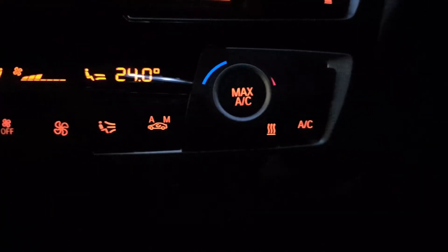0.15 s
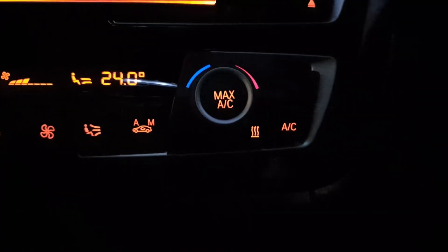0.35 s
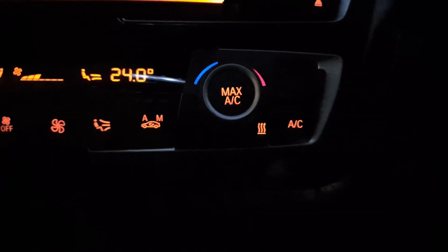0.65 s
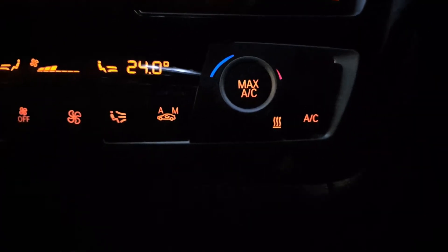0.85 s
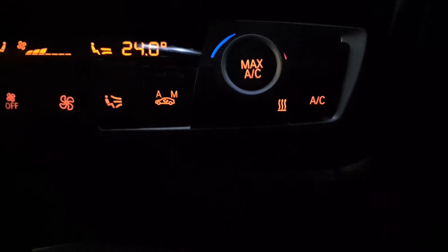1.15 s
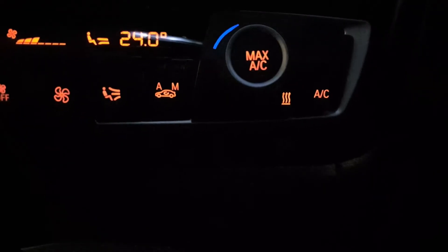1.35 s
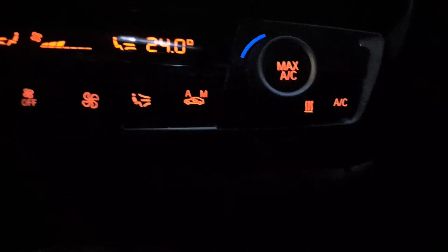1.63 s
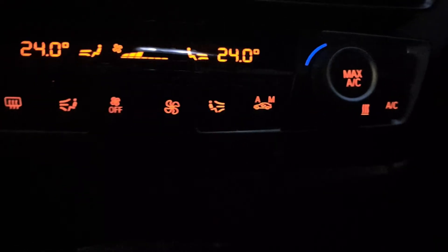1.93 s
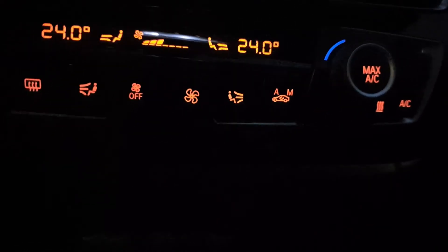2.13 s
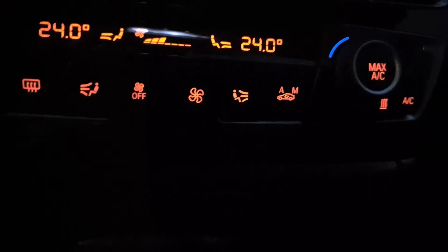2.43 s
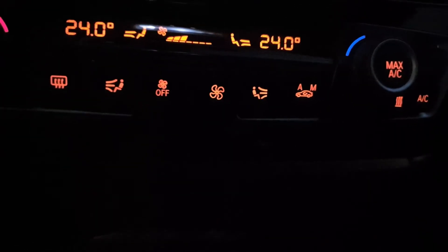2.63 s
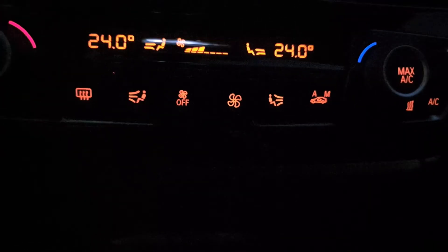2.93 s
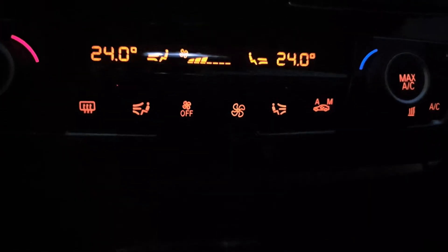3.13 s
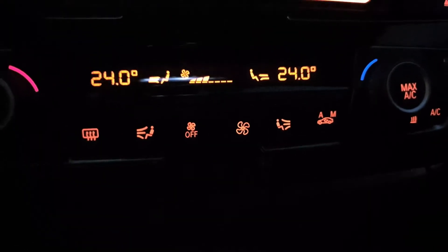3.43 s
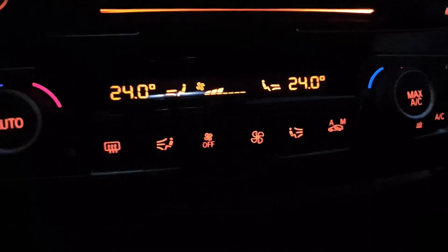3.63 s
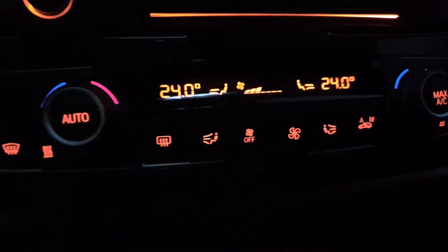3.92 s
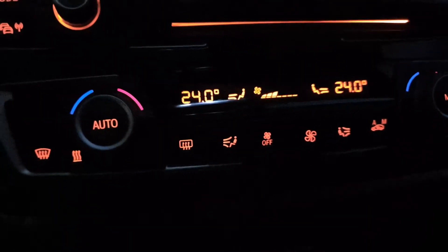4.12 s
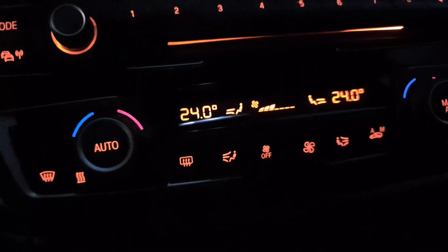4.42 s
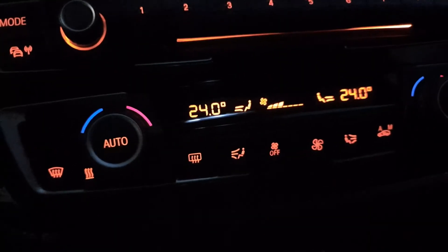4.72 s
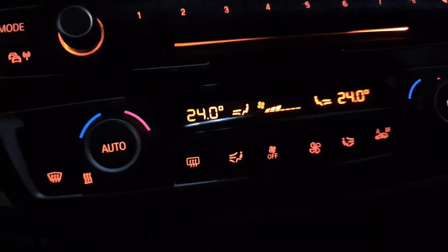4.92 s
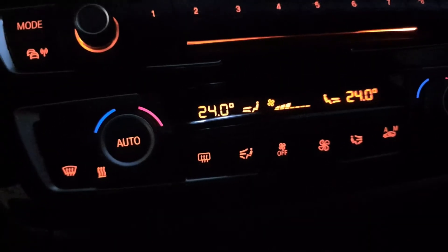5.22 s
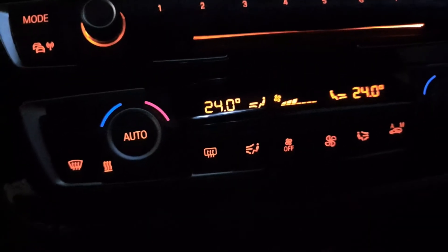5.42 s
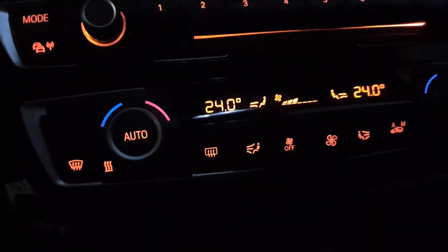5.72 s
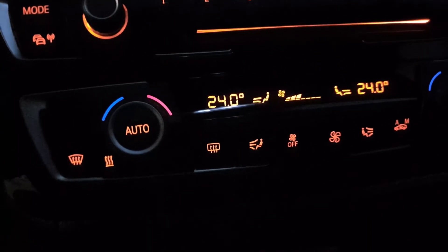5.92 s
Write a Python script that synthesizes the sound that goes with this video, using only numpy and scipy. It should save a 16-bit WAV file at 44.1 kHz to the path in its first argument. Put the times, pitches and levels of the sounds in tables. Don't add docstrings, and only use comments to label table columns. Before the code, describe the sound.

A low, unsteady blower rumble and faint motor hum fill a parked car's cabin while fingers and cloth rustle softly against the handheld microphone.

```python
import sys
import numpy as np
from scipy import signal
from scipy.io import wavfile
from scipy.ndimage import uniform_filter1d

SR = 44100
rng = np.random.default_rng(int(sys.argv[2]) if len(sys.argv) > 2 else 0)


def bounce(signal):
    frames = np.transpose(np.atleast_2d(signal))
    limited = np.clip(frames, -1, 1)
    pcm = np.round(limited * 32767).astype(np.int16)
    wavfile.write(sys.argv[1], SR, pcm)


def voltage_ratio(decibels):
    exponent = np.asarray(decibels, float) / 20
    return 10 ** exponent


N = 267246

# f/Hz, level/dB [per Hz]
BOOM_SPECTRUM = [(25, -30.5), (38, -0.5), (51, 2.5), (58, 0.5), (67, 3.5), (77, 0), (92, 0), (103, -4),
                 (113, -13), (128, -26), (150, -47)]
# t/s, peak level/dB, half length/s
TURBULENT_SURGES = [(0, -30, 0.037), (0.137, -35.5, 0.057), (0.418, -36, 0.16), (0.691, -31, 0.083),
                    (1.03, -37, 0.23), (1.36, -38, 0.095), (1.606, -36.5, 0.13), (1.805, -37.5, 0.14),
                    (2.17, -34, 0.16), (2.346, -33.5, 0.038), (2.502, -36.5, 0.053), (2.898, -39, 0.45),
                    (3.374, -32, 0.021), (3.562, -37, 0.15), (3.873, -40, 0.061), (4.034, -36.5, 0.052),
                    (4.203, -34.5, 0.042), (4.377, -39, .08), (4.56, -34.5, 0.04), (4.838, -38.5, 0.079),
                    (5.087, -40, 0.44), (5.645, -38, .11), (5.797, -34.5, 0.023), (5.938, -38, 0.029),
                    (6.06, -34, 0.031)]
LULL_LEVEL_DB = -44
# f/Hz, level/dB [per Hz]
DUCT_SPECTRUM = [(80, -18.5), (112, -11.5), (138, -2), (158, -8), (175, -5), (212, -2), (228, -7.5),
                 (250, -7), (275, -15.5), (300, -12.5), (325, -24.5), (390, -22.5), (502, -26.5),
                 (760, -33)]
DUCT_LEVEL_DB = -47.5
# f/Hz, level/dB [per Hz]
VENT_SPECTRUM = [(650, -13), (815, -2), (968, -6), (1440, -15), (1810, -14.5), (2420, -14.5), (3040, -21.5),
                 (4230, -22), (5500, -27.5), (6740, -32), (8200, -31), (12700, -29), (12800, -39),
                 (15700, -34)]
VENT_LEVEL_DB = -74.5
# t/s, duct level/dB, vent level/dB, vent left-right level/dB
AIR_AT_PHONE = [(0, -2.5, 3.5, -1), (1, -1, 1.5, 0.5), (2, -2.5, 3.5, -1), (2.8, -2.1, 0.1, -1),
                (4, -3, 0.5, 0.8), (5, -2.5, 2, -1.5), (6.06, -3.6, -1, 1)]
# f/Hz, correlation [-1 to 1]
PORT_LIKENESS = [(40, 0.97), (70, 1), (125, 0.83), (190, 0.95), (290, 1), (500, 0.43), (950, 0.28),
                 (1900, 0.043), (15000, .04)]
# f/Hz, level/dB
PORT_BALANCE = [(60, -1.5), (99, -2.5), (160, 2.5), (270, -1), (450, -1.5), (740, 2), (1220, -5),
                (2010, -6.5), (3330, -1.5), (5500, -1.5), (9080, -0.5), (15000, 0)]
PORT_GAP_S = 0.00016
# t/s [first pose left, second reached, second left, third reached]
POSE_TIMES = [1.3, 2.2, 3.9, 4.3]
# f/Hz, width/Hz, then left level/dB and right level/dB in each of three poses
LOUVRE_MODES = [
    (600, 150, -74, -66.5, -75.5, -72, -75.5, -77),
    (1384, 470, -75.5, -76.5, -79.5, -98.5, -76.5, -89),
    (2033, 240, -81.5, -83.5, -93, -82.5, -100, -87),
    (2448, 240, -92, -99, -84, -79, -92, -83.5),
]
# t/s, turns per second [1/s]
SHAFT_SPEED = [(0, 28.665), (1.2, 28.71), (1.6, 28.6), (2.6, 28.655), (3.6, 28.645), (4.0, 28.685),
               (5.2, 28.665), (6.06, 28.62)]
# order, left level/dB, right level/dB in the first pose, right level/dB in the last
HUM_ORDERS = [(9, -66, -67, -68), (10, -74, -73, -71), (12, -65, -59, -63), (13, -72, -78, -78),
              (14, -77, -76, -81), (15, -75, -69, -77), (16, -76, -71, -78), (17, -82, -83, -84),
              (18, -75, -72, -82), (20, -80, -76, -77), (21, -79, -77, -78), (24, -87, -76, -84)]
# order, level/dB in each of three poses
WHINE_ORDERS = [(67, -93, -91, -96), (68, -94, -93, -94), (69, -84, -85, -93), (72, -79, -84, -86),
                (73, -90, -89, -93), (75, -96, -90, -91), (76, -104, -93, -92), (82, -97, -89, -112),
                (84, -95, -79, -94), (86, -100, -89, -98), (87, -97, -84, -92), (96, -101, -102, -109)]
WHINE_LEFT_DB = -9
# t/s, left peak level/dB, right peak level/dB, f/Hz, ring [cycles]
CASE_KNOCKS = [(.3935, -47.5, -58, 590, 0.86), (0.5735, -68, -43, 715, .4), (.683, -60, -43.5, 950, 1.1),
               (.984, -46, -41, 600, 0.27), (1.072, -58, -34.5, 415, 1), (1.142, -59, -34, 375, 1.3),
               (1.167, -54, -39, 910, 0.17), (1.4584, -51, -35, 425, 0.44), (1.757, -47, -44, 490, 1.4),
               (2.0941, -34, -30.5, 590, 1.14), (2.112, -45, -40, 550, 0.78), (2.252, -57, -40, 600, .6)]
# t/s of peak, length/s, swish level/dB, scrape and fizz level/dB over swish
FINGER_STROKES = [(0.983, 0.17, -91.5, 21, 1), (1.114, 0.19, -86, 17, 5), (1.16, .12, -68.5, 11.5, -2),
                  (1.289, 0.11, -86.5, 18.5, 7), (1.357, 0.093, -74, 14, 2.5),
                  (1.482, .25, -73.5, 10, -0.5), (1.588, 0.21, -62, 3, -9.5), (1.69, 0.28, -71.5, 1.5, -11),
                  (1.783, 0.1, -70, 5, -14), (1.834, .25, -68, 0.5, -9.5)]
SLEEVE_STROKES = [(2.08, 0.49, -78, 3, -20), (2.24, 0.34, -65, -7.5, -17), (2.51, 0.15, -65.5, -19, -18),
                  (2.59, 0.37, -67.5, -8.5, -22)]
SEAM_STROKES = [(3.466, 0.28, -80.5, 7.5, -13)]
STRAP_STROKES = [(3.96, 0.36, -82.5, -2, -11), (4.1, 0.17, -71, -8, -21), (4.15, 0.13, -69.5, -6.5, -17),
                 (4.235, 0.11, -75, -5, -9.5)]
CUFF_STROKES = [(4.48, 0.41, -87.5, -8, 5.5), (4.602, 0.21, -67, -7.5, -4.5),
                (4.73, 0.32, -66.5, -8.5, -6.5), (4.925, 0.15, -76, -7, 4), (5.01, .25, -87.5, -12, 10.5),
                (5.1, .12, -88.5, -8, 11.5), (5.16, 0.14, -68, -8, -8.5), (5.41, 0.17, -84, -13, 9),
                (5.52, 0.32, -70, -7.5, -4), (5.64, 0.32, -70.5, -5.5, -8), (5.8, 0.22, -80.5, -5, -5),
                (5.938, 0.14, -83, 7, 3.5), (6.06, 0.12, -73.5, -3, -10.5)]
# f/Hz and width [octaves] of swish, scrape and fizz in turn
MATERIAL_BANDS = [
    (3100, 0.45, 450, 1.1, 8900, 0.42),
    (3800, 0.22, 1840, 0.42, 8800, 0.27),
    (2800, 0.39, 1000, .4, 9500, .3),
    (3570, 0.095, 2030, 0.28, 10500, 0.45),
    (4180, 0.2, 2200, 0.3, 10800, 0.38),
]
# left-right level/dB of swish, scrape, fizz
MATERIAL_SIDES = [(-28, -23, -26), (-11, 0.5, 1), (-9, 10.5, 0), (-9, -10, 0), (-4, -7.5, -1.5)]
MATERIAL_GRIP = [(0.43, 1.52), (0.46, 1.6), (.55, 1.8), (0.41, 1.7), (0.44, 1.94)]
SKIRT_LEVELS = [-40, -2.5, -39, -11, -4.5]
SKIRT_HZ, SKIRT_OCTAVES = 4570, 0.42
EDGE_DB, FIZZ_FOLLOWS = -22, 0.73
# f/Hz, left level/dB, right level/dB
PORT_CAVITIES = [(2040, 3.5, 7), (3120, -0.5, 3.5), (3550, 0.5, 3.5), (4100, -4.5, 0.7), (6540, 0.5, -1.5),
                 (7750, 3, -9), (9050, 3.5, 4), (11340, 0.5, 5), (13000, -1, -9.5)]


def evened(x):
    return x / np.sqrt(np.mean(x ** 2) + 1e-20)


def read(points, hz):
    f, value = np.transpose(points)
    return np.interp(np.log(hz + 1), np.log(f + 1), value, left=value[0], right=value[-1])


def follow(rows):
    s, *columns = np.transpose(rows)
    return np.array([np.interp(np.arange(N) / SR, s, c) for c in columns])


def sides(db):
    ratio = voltage_ratio(np.clip(db, -30, 30)) ** 2
    return np.sqrt(2 * np.array([ratio, np.ones_like(ratio)]) / (1 + ratio))


def posed(db, t):
    first, second, third = np.reshape(db, (3, 2))
    return voltage_ratio([np.interp(t, POSE_TIMES, [first[k], second[k], second[k], third[k]]) for k in range(2)])


def noise(shape, size, patchy_db, stripes_db):
    frames, hz = 4 * N // size + 5, np.fft.rfftfreq(size, 1 / SR)
    a, b, c, d, patches = rng.standard_normal((frames, len(hz), 5)).T
    patches = uniform_filter1d(uniform_filter1d(patches, size=9, axis=0), size=7, axis=1)
    like = np.clip(read(PORT_LIKENESS, hz), -1, 1)[:, None]
    left = a + 1j * b
    advance = np.exp(2j * np.pi * hz * PORT_GAP_S)[:, None]
    right = like * left * advance + np.sqrt(1 - like ** 2) * (c + 1j * d)
    flicker = stripes_db * rng.standard_normal(frames)
    z = np.array([left, right])
    z *= voltage_ratio(read(shape, hz)[:, None] + patchy_db * evened(patches) + flicker)
    inside = (hz >= shape[0][0]) & (hz <= shape[-1][0])
    z *= (inside * sides(read(PORT_BALANCE, hz)))[:, :, None]
    return evened(signal.istft(z, nperseg=size, noverlap=3 * size // 4)[1][:, :N])


def boom():
    x = noise(BOOM_SPECTRUM, size=8192, patchy_db=1.25, stripes_db=1.0)
    own_swell = uniform_filter1d(uniform_filter1d(x.mean(0) ** 2, size=2600), size=2600)
    t = np.arange(0, N + 64, 64) / SR
    power = voltage_ratio(LULL_LEVEL_DB) ** 2
    for s, db, half in TURBULENT_SURGES:
        power = power + voltage_ratio(db - 9.4 * ((t - s) / half) ** 2) ** 2
    swell = np.interp(np.arange(N) / SR, t, np.sqrt(power))
    return swell * x / np.sqrt(own_swell + 0.033)


def air():
    duct_db, vent_db, lean_db = follow(AIR_AT_PHONE)
    duct = noise(DUCT_SPECTRUM, size=4096, patchy_db=0.77, stripes_db=2.5)
    vent = noise(VENT_SPECTRUM, size=1024, patchy_db=0.3, stripes_db=0.2)
    out = voltage_ratio(DUCT_LEVEL_DB + duct_db) * duct
    out += voltage_ratio(VENT_LEVEL_DB + vent_db) * sides(lean_db) * vent
    for hz, width_hz, *db in LOUVRE_MODES:
        b, a = signal.iirpeak(hz, hz / width_hz, SR)
        hush = signal.lfilter(b, a, signal.lfilter(b, a, rng.standard_normal((2, N))))
        out += posed(db, np.arange(N) / SR) * evened(hush)
    return out


def orders():
    low = [(k, left, first, left, (first + last) / 2, left, last) for k, left, first, last in HUM_ORDERS]
    high = [(k, *np.add.outer(db, [WHINE_LEFT_DB, 0]).ravel()) for k, *db in WHINE_ORDERS]
    return low + high


def motor():
    t = np.arange(0, N + 64, 64) / SR
    turn = 2 * np.pi * np.cumsum(follow(SHAFT_SPEED)[0]) / SR
    out = np.zeros((2, N))
    for order, *db in orders():
        waver = uniform_filter1d(rng.standard_normal(len(t)), size=140) * np.sqrt(140)
        level = posed(db, t) * voltage_ratio(min(0.1 * order, 1.5) * waver + 0.0031 * order)
        start = 1.03 * rng.standard_normal()
        for side, lead in enumerate([0, min(0.075 * order, 0.7)]):
            line = np.cos(order * turn + start + lead)
            out[side] += np.interp(np.arange(N) / SR, t, level[side]) * line
    return voltage_ratio(3.0) * out


def ticks():
    out, t = np.zeros((2, N)), np.arange(500) / SR
    for s, left_db, right_db, hz, ring in CASE_KNOCKS:
        cycles = hz * np.array([t, np.maximum(t - 0.0003, 0)])
        decay = np.exp(-cycles / [[0.6 * ring], [ring]])
        onset = np.minimum(cycles / [[0.15], [0.33]], 1)
        pulse = np.sin(2 * np.pi * cycles) * decay * onset
        pulse /= abs(pulse).max(1)[:, None]
        at = round(s * SR)
        out[:, at:at + 500] += voltage_ratio([[left_db], [right_db]]) * [[-1], [1]] * pulse
    return out


def stroke(t, s, length, rise_share, blunt):
    reach = length * np.where(t < s, rise_share, 1 - rise_share)
    return EDGE_DB * abs((t - s) / reach) ** blunt


def band(hz, centre_hz, octaves):
    return np.exp(-0.5 * (np.log2((hz + 1) / centre_hz) / octaves) ** 2)


def rustle():
    t, hz = np.arange(N // 64 + 5) * 64 / SR, np.fft.rfftfreq(256, 1 / SR)[:, None]
    power = np.zeros((2, len(hz), len(t)))
    strokes = [FINGER_STROKES, SLEEVE_STROKES, SEAM_STROKES, STRAP_STROKES, CUFF_STROKES]
    materials = zip(strokes, MATERIAL_BANDS, MATERIAL_SIDES, MATERIAL_GRIP, SKIRT_LEVELS)
    for rows, colour, leans, grip, skirt_db in materials:
        s, length, db, scrape_db, fizz_db = np.transpose(rows)[:, :, None]
        swish_db = stroke(t, s, length, *grip)
        levels = [swish_db, scrape_db + swish_db, fizz_db + FIZZ_FOLLOWS * swish_db]
        for k, band_db in enumerate(levels):
            bump = band(hz, colour[2 * k], colour[2 * k + 1])
            if k == 0:
                bump = bump + voltage_ratio(skirt_db) ** 2 * band(hz, SKIRT_HZ, SKIRT_OCTAVES)
            movement = (voltage_ratio(db + band_db) ** 2).sum(0)
            power += bump / bump.sum() * movement * sides(leans[k])[:, None, None] ** 2
    a, b, c, d, patches = rng.standard_normal((len(t), len(hz), 5)).T
    patches = evened(uniform_filter1d(uniform_filter1d(patches, size=14, axis=1), size=4, axis=0))
    slips = rng.standard_normal(len(t))
    left = a + 1j * b
    z = np.array([left, 0.2 * left + c + 1j * d]) * voltage_ratio(1.5 * patches + 1.6 * slips)
    cavities_db = [read(np.take(PORT_CAVITIES, [0, k], axis=1), hz) for k in (1, 2)]
    z *= np.sqrt(power) * voltage_ratio(cavities_db)
    return voltage_ratio(0.5) * signal.istft(z, nperseg=256, noverlap=192)[1][:, :N]


def scene():
    return boom() + air() + motor() + ticks() + rustle()


def top_cut(x):
    return signal.sosfilt(signal.butter(12, 15710, fs=SR, output="sos"), x)


def record(dry):
    high_pass = signal.butter(4, 38.0, "high", fs=SR, output="sos")
    mix = signal.sosfiltfilt(high_pass, dry)
    return top_cut(mix)


dry = scene()
out = record(dry)
bounce(out)
```